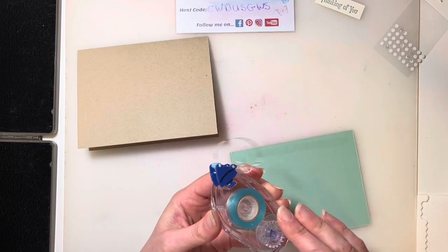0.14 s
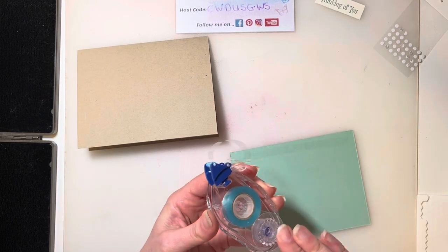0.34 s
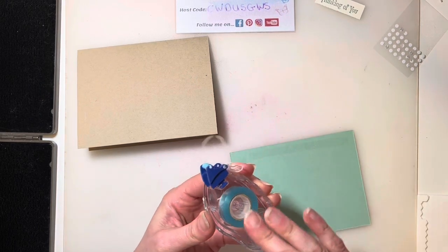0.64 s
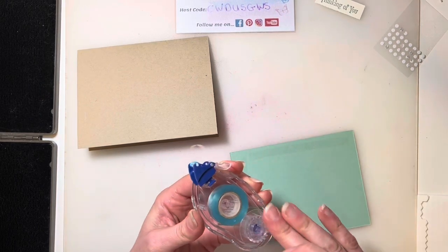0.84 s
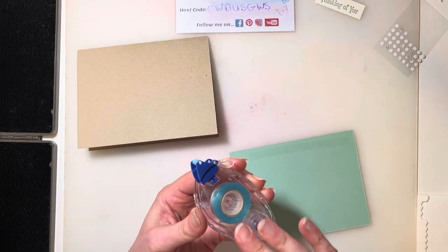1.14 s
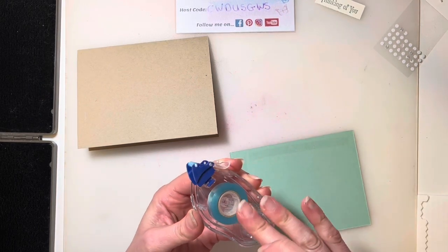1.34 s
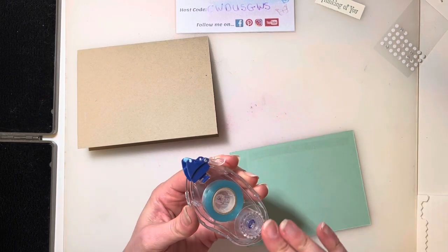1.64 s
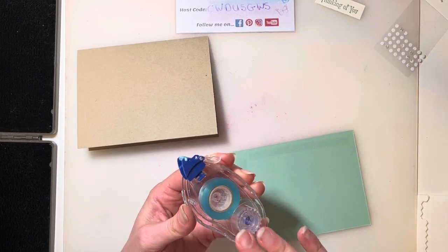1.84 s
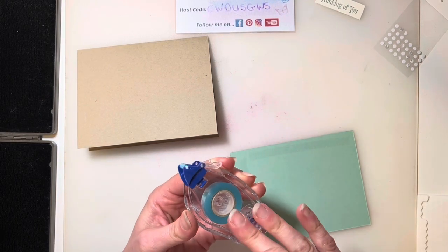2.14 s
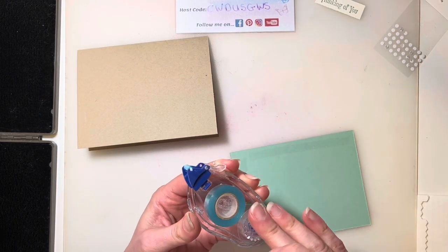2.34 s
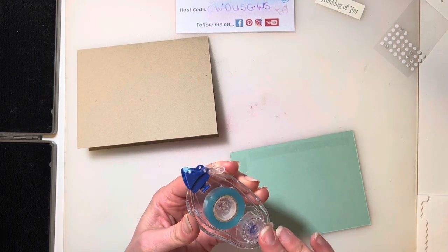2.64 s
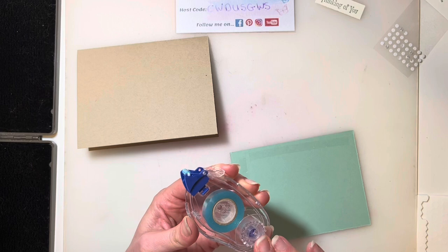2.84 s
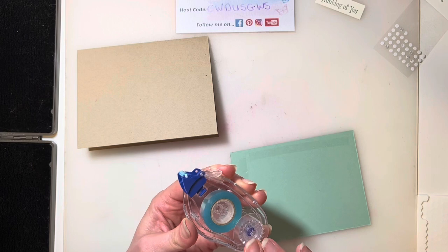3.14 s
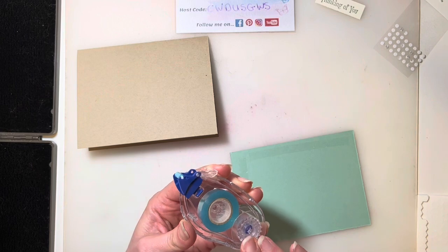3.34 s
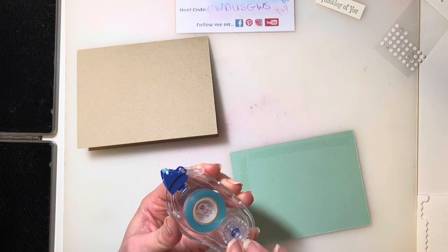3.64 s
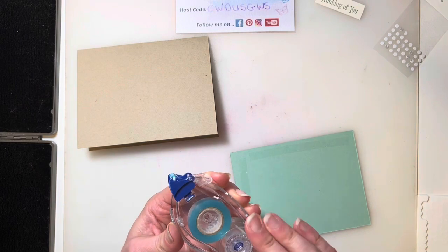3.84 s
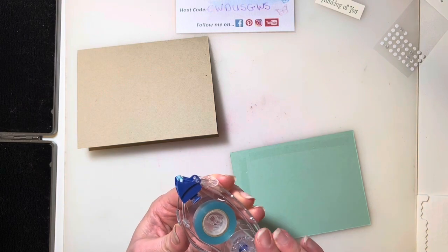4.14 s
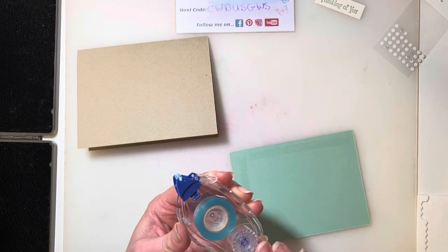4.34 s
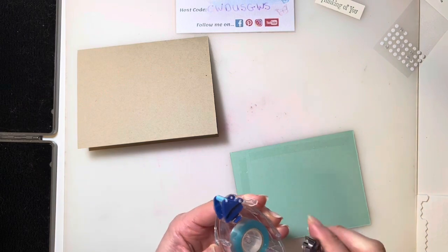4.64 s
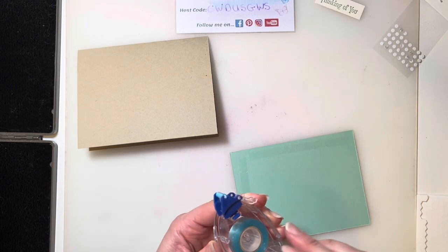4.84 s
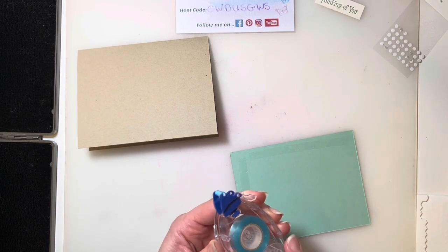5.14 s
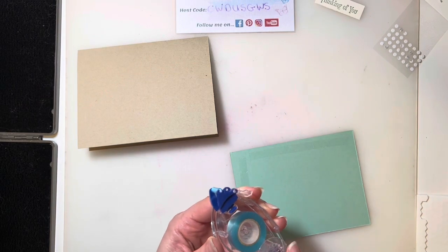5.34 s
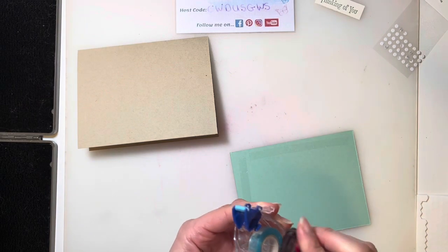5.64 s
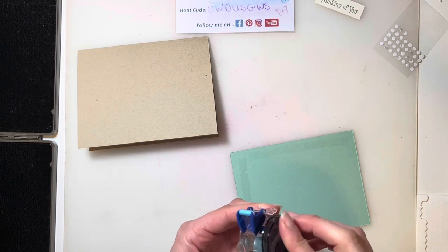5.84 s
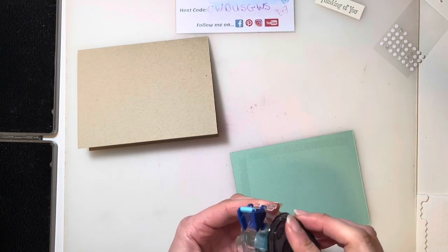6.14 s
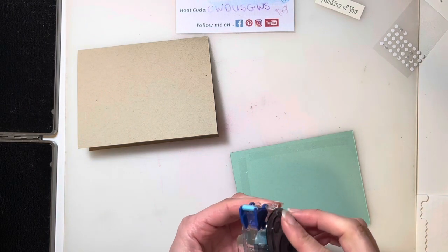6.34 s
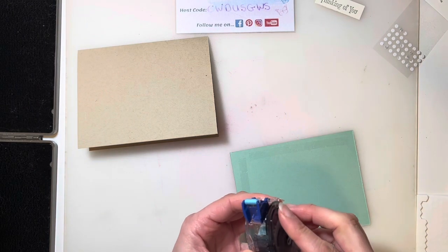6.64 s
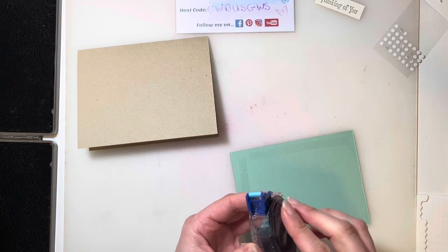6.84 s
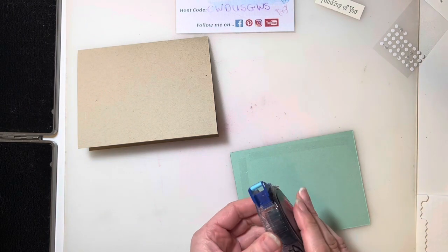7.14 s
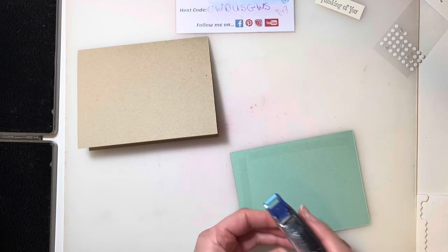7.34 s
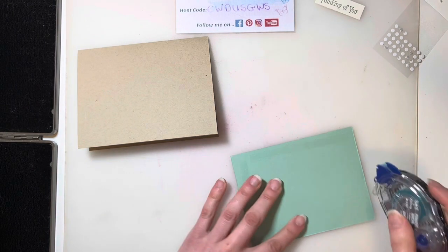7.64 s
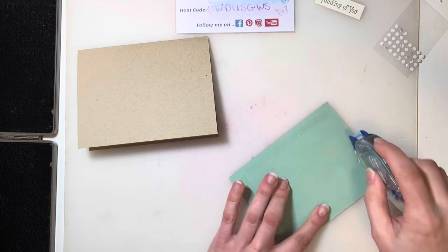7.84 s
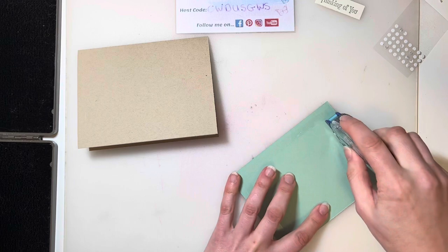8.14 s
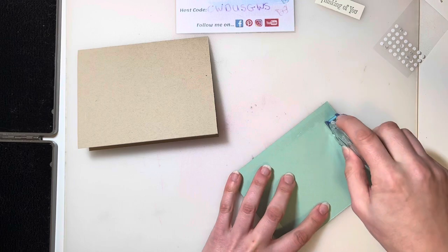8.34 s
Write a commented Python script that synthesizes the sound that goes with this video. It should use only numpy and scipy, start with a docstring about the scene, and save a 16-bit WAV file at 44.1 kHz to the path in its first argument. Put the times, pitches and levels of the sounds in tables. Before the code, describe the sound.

A plastic tape runner's gears ratchet in quick bright clicks, then its cover creaks, snaps shut, and it thuds onto a desk.

```python
"""A plastic tape runner ratchets as a finger turns its gears: the pawl clicks over tooth after tooth,
and each click rings the small parts of the case. The cover creaks in the hands and snaps shut with a
thump, a card hisses round on the desk, and the runner lands on it and rolls with a low rumble.
A quiet room hums behind it all."""
import sys
import numpy as np
from scipy import signal
from scipy.fft import rfft, irfft
from scipy.io import wavfile
from scipy.ndimage import uniform_filter1d

SR = 44100
rng = np.random.default_rng(int(sys.argv[2]) if len(sys.argv) > 2 else 0)


def wav_out(sig):
    """Save sig, one row per channel (or a flat mono array), as 16-bit PCM at SR to the path in sys.argv[1]."""
    wavfile.write(sys.argv[1], SR, np.round(np.clip(np.atleast_2d(sig).T, -1, 1) * 32767).astype(np.int16))


N = 374850


def amp(db):
    """Decibels to gain."""
    return 10 ** (np.asarray(db) / 20)


def unit(x):
    """Scales to energy 1."""
    return x / np.sqrt(np.sum(x ** 2) + 1e-20)


def curve(points, hz):
    """Reads a table on a log-frequency axis."""
    f, value = np.transpose(points)
    return np.interp(np.log(hz + 1), np.log(f + 1), value)


def add(mix, s, sound):
    """Mixes a sound in at second s."""
    part = mix[round(s * SR):][:len(sound)]
    part += sound[:len(part)]


# Stereo image of diffuse sound: (frequency [Hz], left-right correlation [0..1])
CORRELATION = [(60, 0.94), (300, 0.65), (1400, 0.2), (5000, 0.55), (8000, 1)]
def diffuse_noise(spectrum):
    """Two partly alike channels of noise with the given power per Hz."""
    hz = np.fft.rfftfreq(N, 1 / SR)
    left, other = rfft(rng.standard_normal((2, N))) * np.sqrt(SR / 2)
    alike = np.clip(curve(CORRELATION, hz), 0, 1)
    right = alike * left + np.sqrt(1 - alike ** 2) * other
    return irfft(amp(curve(spectrum, hz)) * np.array([left, right]), N)


# Dark bed of room air: (frequency [Hz], density [dB per Hz])
AIR_BED = [(25, -96), (50, -77.5), (165, -85), (314, -89.5), (500, -92), (800, -102), (2120, -107),
           (4660, -114), (6000, -124), (16000, -134)]
# Machine drones: (pitch [Hz], width [Hz], level [dB])
DRONES = [(36, 4, -57.5), (61.5, 2, -53), (121, 8, -67), (233, 10, -69)]
def room_tone():
    """Room air and low machine drones; a narrow band of noise makes each drone waver."""
    hz = np.fft.rfftfreq(N, 1 / SR)
    hum = 0
    for pitch_hz, width_hz, db in DRONES:
        band = np.exp(-((hz - pitch_hz) / width_hz) ** 2)
        waver = unit(irfft(rfft(rng.standard_normal(N)) * band, N))
        steady = unit(np.sin(2 * np.pi * pitch_hz * np.arange(N) / SR))
        hum = hum + amp(db) * np.sqrt(N) * unit(waver + 10 * steady)
    return diffuse_noise(AIR_BED) + hum


def contact(rise_s, fall_s, rattle_s, rattle_db):
    """Envelope of a contact: a quick blow and a weaker rattle after it."""
    t = np.arange(SR // 20) / SR
    return (1 - np.exp(-t / rise_s)) * (np.exp(-t / fall_s) + amp(rattle_db) * np.exp(-t / rattle_s))


SPREAD_DB, DETUNE = 2, .12  # scatter from hit to hit: mode level, pitch as a share of the width
BLUR = 1.5  # widening of the modes when all directions are averaged
def strike(modes, envelope, tap, tilt_db, blur):
    """A clean tap plus a rough scrape rings one part. Columns: direct sound, all-round sound."""
    t = np.arange(SR // 20)[:, None] / SR
    hz, width_hz, db = np.transpose(modes)
    detune, lift, phase = rng.standard_normal((3, len(modes)))
    level = amp(db + tilt_db * np.log2(hz))
    swell = width_hz ** 2 * t * np.exp(-np.pi * width_hz * t)  # a soft start keeps the skirts steep
    pitch_hz = hz + DETUNE * width_hz * detune
    rings = level * amp(SPREAD_DB * lift) * swell * np.sin(2 * np.pi * pitch_hz * t + 1.55 * phase)
    drive = unit(envelope * rng.standard_normal(len(envelope)))
    drive[np.argmax(envelope)] += tap
    direct = signal.fftconvolve(rings.sum(1), drive)[:len(t)]
    wide_hz = blur * width_hz
    wide_swell = wide_hz ** 2.6 * np.sqrt(width_hz) * t * np.exp(-np.pi * wide_hz * t)
    around = level * wide_swell * np.sin(2 * np.pi * hz * t + np.pi / 2 * np.arange(len(hz)))
    low_cut = signal.butter(2, .75 * hz.min(), "highpass", fs=SR)  # small parts radiate little bass
    return np.transpose([unit(signal.lfilter(*low_cut, x)) for x in (direct, around.sum(1))])


# Modes of the plastic parts: (pitch [Hz], width [Hz], relative level [dB])
OPEN_CASE = [(705, 810, 1), (1080, 220, -2), (1590, 480, 5)]  # dull knock
SHUT_CASE = [(880, 59, -8), (1230, 500, -14), (1442, 55, 3), (1780, 140, -10)]  # hollow ring
COVER_MODES = [(1775, 130, -17), (2210, 505, -3), (2440, 300, -7.5), (2984, 400, -4.5), (3700, 460, -2.5),
               (3860, 320, -0.5), (4206, 160, -1), (4720, 470, -2.5), (5800, 500, -7.5)]  # midrange clack
PAWL_MODES = [(6326, 220, -5.5), (6810, 440, -4.5), (7340, 1500, -1)]  # bright tick
RATTLE_MODES = [(9200, 1600, 6), (10900, 3800, -5.5), (13160, 2900, 3.5), (14300, 700, -12)]  # fine top-end sizzle
# Creaks, knocks and snaps: (time [s], cover level [dB], treble offset [dB], case offset [dB])
COVER_HITS = [(.116, -26.5, -7.5, -28), (.173, -27, -7, -29), (3.645, -28, -17.5, -28),
              (3.844, -30, -7, -29.5), (4.564, -27, -16, -23), (4.576, -18, -19, -28),
              (5.601, -27.5, -17, -26.5), (5.613, -32, -19, -30), (5.693, -19, -13, -21),
              (5.714, -17, -23, -30), (5.754, -12.5, -20, -17), (5.768, -13.5, -12.5, -14),
              (5.779, -16, -16, -19), (5.794, -20, -20, -27), (5.805, -22, -28, -23),
              (5.915, -29, -22, -28), (6.038, -34.5, -10.5, -30), (6.074, -21.5, -22, -13),
              (6.126, -20, -18, -18.5), (6.208, -20, -6.5, -16), (6.327, -17.5, -24, -11),
              (6.3405, -17.5, -23, -16), (6.349, -15.5, -17.5, -27), (6.401, -18, -16, -14),
              (6.415, -8, -2, -14.5), (6.427, -26, -10, -19), (6.504, -19.5, -22, -20),
              (6.543, -22, -15, -20), (6.572, -15.5, -17, -11), (6.605, -25.5, -23, -30.5),
              (6.721, -35, -33, -25), (6.9685, -6, -14.5, -16), (6.9705, -7.5, -21, -23),
              (6.9727, -10.5, -6.5, -28), (6.9778, -19.5, -10, -0.5), (7.1615, 0, -7, 7.5),
              (7.1675, 8, -14.5, -10.5), (7.1707, 1, -6.5, -8), (7.381, -29, -13.5, 3),
              (7.887, -39, -6, -2.5), (8.205, -20, -12.5, 1)]
HARD_DB, BRIGHTEN = 1.5, .87  # level of a hard hit; cover tilt in dB per octave for each dB beyond it
SHUT_S = 7.1  # later hits ring the shut case
def cover_handling():
    """Fingers flex the cover and snap it shut; harder hits ring its higher modes."""
    out = np.zeros((3, N, 2))  # three nearby spots in turn
    creak = contact(rise_s=.0026, fall_s=.0009, rattle_s=.0032, rattle_db=-7)
    for k, (s, db, treble_db, case_db) in enumerate(COVER_HITS):
        case = OPEN_CASE if s < SHUT_S else SHUT_CASE
        tap = .6 if db < HARD_DB else 3
        cover_tilt = BRIGHTEN * max(db - HARD_DB, -14)
        for part, part_db, tilt_db in ((case, case_db, 0), (COVER_MODES, 0, cover_tilt),
                                       (PAWL_MODES, treble_db, 0), (RATTLE_MODES, treble_db + 1.8, 0)):
            ring = strike(part, creak, tap, tilt_db, blur=1.05 if part is SHUT_CASE else BLUR)
            add(out[k % 3], s, amp(db + part_db) * ring)
    return out


# Colour of the friction hiss: (frequency [Hz], relative density [dB])
HISS_COLOUR = [(500, 5), (3500, 7), (5500, 1), (11000, -3), (16000, -3)]
# Skin and card slides: (hold start [s], hold length [s], level [dB], fade-in [dB/s])
SLIDE_CUES = [(0.175, 0.029, -59.5, 320), (4.006, 0.63, -74, 57), (5.75, 0.021, -56, 191),
              (6.935, 0.021, -58.5, 100), (7.03, 0.47, -66, 302), (7.626, 0.18, -61, 705.5),
              (7.89, 0.094, -63.5, 401.5), (8.33, .2, -48.5, 590.5)]
FADE_DB_PER_S, RUSTLE_DB, GRAIN_DB = 237, -84.5, 2.2  # fade-out, floor between slides, roughness
CARD_S, CARD_LIFT_DB = 7.6, 9.5  # the turning card hisses brighter
def slides():
    """Grainy hiss of skin on plastic and card on the desk; each slide swells, holds and fades."""
    t, level_db = np.arange(N) / SR, RUSTLE_DB
    for start, length, db, rise in SLIDE_CUES:
        fade_db = np.minimum(rise * (t - start), FADE_DB_PER_S * (start + length - t))
        level_db = np.maximum(level_db, db + np.minimum(fade_db, 0))
    grain = unit(uniform_filter1d(rng.standard_normal(N), size=150)) * np.sqrt(N)
    hiss = np.sqrt(2 * N) * unit(diffuse_noise(HISS_COLOUR))
    treble = signal.lfilter(*signal.butter(2, 8000, "highpass", fs=SR), hiss)
    card_turning = (t > CARD_S) & (t < CARD_S + .27)
    hiss += (amp(CARD_LIFT_DB) - 1) * treble * card_turning
    return amp(level_db + GRAIN_DB * grain) * hiss


# The holding hand frees or damps parts of the case:
# (time [s], shell offset while winding [dB], flank over shell [dB], ribs over shell [dB])
HAND_GRIP = [(.347, 2, -7, -6.5), (.4, -16.5, -22, 1.5), (.447, 3.5, -4, -7), (.5, -9, -11, -6),
             (.6, -12, -7.5, 0), (.68, -6, -7, -2.5), (.77, -4.5, -10.5, 0.5), (.81, 0, -5, -9),
             (.95, -10, -1.5, -5), (1.0, 3.5, -8, -3.5), (1.08, -13.5, -6, 1.5), (1.16, -9, -10.5, -0.5),
             (1.345, -6.5, -16, -4), (1.42, -8.5, -6, 6.5), (1.53, -1.5, -7, -6), (1.6, -14, -4.5, -6),
             (1.7, -1.5, 3, -3.5), (1.83, -10, -5, -7.5), (1.95, -7.5, -12, 1.5), (2.27, -4, -13.5, -1.5),
             (2.38, -1, -2.5, 1.5), (2.55, -9, 0.5, -8), (2.8, -23, 6, -2.5), (2.95, -9, -8.5, 1),
             (4.2, -9, -2.5, 0), (5.2, -9, -0.5, -3.5), (8.4, -9, -4.5, -5)]
# The finger pushes and eases, one list per unbroken wind: (time [s], speed [teeth/s])
GEAR_WINDS = [
    [(.3463, 31.6), (.403, 32.8), (.451, 79.8), (.478, 51.0), (.538, 40.3), (.631, 77.5), (.658, 58.5),
     (.76, 32.1), (.817, 68.5), (.847, 77.8), (.913, 40.5), (.949, 42.8), (1.009, 88.0), (1.09, 45.5),
     (1.147, 87.4), (1.18, 73.8)],
    [(1.3435, 41.7), (1.368, 50.1), (1.464, 33.4), (1.542, 71.9), (1.614, 30.4), (1.698, 51.9),
     (1.722, 59.5), (1.8, 18.8), (1.857, 56.7), (1.881, 65.4), (1.961, 54.1)],
    [(2.2592, 30.6), (2.349, 32.7), (2.436, 28.2), (2.466, 24.0), (2.611, 14.1)],
]
TOOTH_DB, UNEVEN_DB = -5, 1.5  # click level and its scatter
def wound_teeth():
    """One pawl drop for each whole tooth the gear turns: (time [s], level [dB], shell offset [dB])."""
    grip_s, shell_db, _, _ = np.transpose(HAND_GRIP)
    clicks = []
    for wind in GEAR_WINDS:
        s, speed = np.transpose(wind)
        t = np.arange(s[0], s[-1], 1 / SR)
        teeth = np.cumsum(np.interp(t, s, speed)) / SR
        drop_s = t[np.searchsorted(teeth, np.arange(np.ceil(teeth[-1])))]
        db = TOOTH_DB + UNEVEN_DB * rng.standard_normal(len(drop_s))
        clicks += zip(drop_s, db, np.interp(drop_s, grip_s, shell_db))
    return clicks


# Case modes that colour each click: (pitch [Hz], width [Hz], relative level [dB])
FLANK_MODES = [(2378, 390, 2.5), (2160, 360, -15.5)]
SHELL_MODES = [(3005, 440, 6), (3475, 550, -1)]
RIB_MODES = [(4350, 790, 0.012), (5120, 540, 0)]
# Teeth nudged over one at a time: (time [s], level [dB], shell offset [dB])
SINGLE_TEETH = [(0.1992, -3.5, 0), (0.221, -5.5, -3), (0.2472, -4.5, -1), (0.2845, -5, -3),
                (0.8285, -10.5, 5.5), (1.2403, -1.5, -7), (1.3062, -2.5, -16), (2.1784, -5, 1),
                (2.77, -6.5, -13.5), (2.8579, -5.5, -11), (2.927, -4, -5), (2.986, -2, -6),
                (3.325, -6, -10), (3.9327, -4, -13.5), (4.1202, -3.5, -15.5), (4.1963, -4.5, -15),
                (4.219, -2.5, -10.5), (4.244, -1, -11.5), (4.27, -3, -9), (4.325, -2.5, -14),
                (5.0792, -11, 4.5), (5.114, -10, 4.5), (5.1499, -8.5, 6), (5.2434, -8, 3),
                (5.3073, -7.5, 1.5), (5.3464, -6.5, 1), (5.465, -30.5, 10.5), (8.3266, -8, -7.5),
                (8.3578, -11, -1.5), (8.3823, -11, 0.5), (8.4152, -14, 4), (8.44, -16.5, 7)]
# Slowly changing level of the fine rattle in the clicks: (time [s], offset [dB])
RATTLE_LEVEL = [(.25, 1), (.45, 0), (3.3, 1.5), (3.95, 1), (4.23, -1.5), (5.1, 12.5), (5.35, 8.5),
                (5.47, -1), (8.32, -2.5), (8.44, 9)]
TOUCHDOWN_S = 8.204  # the roller meets the card
def ratchet():
    """The pawl snaps off each gear tooth and shakes the case; on the card it drags and booms more."""
    out = np.zeros((3, N, 2))  # three nearby spots in turn
    snap = contact(rise_s=.0001, fall_s=.0007, rattle_s=.0032, rattle_db=-9)
    drag = contact(rise_s=.000374, fall_s=.00099, rattle_s=.0075, rattle_db=-13.5)
    grip_s, _, flank_ride, rib_ride = np.transpose(HAND_GRIP)
    for k, (s, db, shell_db) in enumerate(SINGLE_TEETH + wound_teeth()):
        rattle_db = np.interp(s, *np.transpose(RATTLE_LEVEL))
        flank_db = shell_db + np.interp(s, grip_s, flank_ride) - 4.34
        rib_db = shell_db + np.interp(s, grip_s, rib_ride) - 2.46
        knock_db = shell_db / 2 - 24 + 4 * rng.standard_normal()
        if s < TOUCHDOWN_S:
            envelope, tap, case = snap, 2.2, (OPEN_CASE, knock_db, 0)
        else:
            envelope, tap, case = drag, .6, (SHUT_CASE, shell_db - 3.5, 7)
        layers = (case, (FLANK_MODES, flank_db, 0), (SHELL_MODES, shell_db + .07, 0),
                  (RIB_MODES, rib_db, 0), (PAWL_MODES, .3, 0), (RATTLE_MODES, rattle_db, 0))
        for part, part_db, tilt_db in layers:
            part_tap = .3 * tap if part is RATTLE_MODES else tap
            ring = strike(part, envelope, part_tap, tilt_db, blur=3.2 if part is SHELL_MODES else BLUR)
            add(out[k % 3], s, amp(db + part_db) * ring)
    return out


def lid_thump(snap_s=7.168, pitch_hz=185, t60_s=.4):
    """The lid snaps home and thumps low through the hands."""
    out, t = np.zeros(N), np.arange(SR // 4) / SR
    envelope = amp(-43 - 60 * t / t60_s) * np.minimum(t / .038, 1)
    add(out, snap_s, envelope * np.sin(2 * np.pi * pitch_hz * t))
    return out


def landing(roll_s=8.32):
    """The runner is pressed on the card: the desk top thuds, then rumbles under the roller."""
    out, t = np.zeros(N), np.arange(SR // 2) / SR
    knock = amp(-29 - 60 * t / .016) * np.sin(2 * np.pi * 260 * t)
    thud = amp(-28 - 60 * t / .061) * np.sin(-2 * np.pi * 85 * t)
    desk_band = signal.butter(2, [95, 300], "bandpass", fs=SR, output="sos")
    rumble = signal.sosfilt(desk_band, rng.standard_normal(len(t)))
    add(out, TOUCHDOWN_S, knock)
    add(out, TOUCHDOWN_S + .0097, thud)
    add(out, roll_s, amp(-30) * rumble * np.clip(t / .012, 0, 1))
    return out


# Reflections off the desk and nearby things: (delay [s], level [dB])
EARLY_ECHOES = [(.0026, -13), (.0092, -20)]
# Short room tail: (frequency [Hz], time to fall 60 dB [s])
TAIL_DECAY = [(500, 0.14), (1500, 0.2), (4000, 0.22), (12000, 0.16)]
def room(hits, tail_db):
    """The direct sound gets early echoes; the all-round sound feeds a short diffuse tail."""
    direct, around = hits.T
    early = np.zeros((2, SR // 20))
    early[:, 0] = 1
    for s, db in EARLY_ECHOES:
        for channel in early:
            add(channel, s, unit(rng.standard_normal(size=40)) * amp(db))
    white = diffuse_noise([(1, 0)])[:, :SR // 2]
    hz, t, bands = signal.stft(white, SR, nperseg=128)
    onset = np.clip(t / .0024, 0, 1)
    decay = amp(-60 * t / curve(TAIL_DECAY, hz)[:, None])
    tail = signal.istft(bands * onset * decay, SR, nperseg=128)[1]
    wet = signal.fftconvolve(around[None], unit(tail) * np.sqrt(2), axes=1)[:, :N]
    return signal.fftconvolve(direct[None], early, axes=1)[:, :N] + amp(tail_db) * wet


def scene():
    """The full mix; each spot that clicks or creaks has its own echoes."""
    gears = sum(room(spot, tail_db=-10.5) for spot in ratchet())
    cover = sum(room(spot, tail_db=-6) for spot in cover_handling())
    return gears + cover + lid_thump() + landing() + slides() + room_tone()


# Left-right phase, held near antiphase around 8-9.4 kHz: (frequency [Hz], left lead [rad])
STEREO_PHASE = [(0, 0), (300, .1), (3200, 1.1), (5200, .2), (7900, -3.0), (9400, -3.4), (10900, -5.9),
                (12500, -6.5), (15100, -9.4)]
# Left-right level, centred above 8.2 kHz: (frequency [Hz], left over right [dB])
STEREO_BALANCE = [(400, -.5), (700, 2.5), (1300, -1.5), (3000, 1.8), (7000, 1.8), (8200, 0)]
HIGH_CUT_HZ = 16800
def record(dry):
    """Left and right differ in phase and level by frequency; a steep high cut trims the top."""
    hz = np.fft.rfftfreq(N, 1 / SR)
    lead = np.interp(hz, *np.transpose(STEREO_PHASE))
    left = np.exp(.5j * lead) * amp(curve(STEREO_BALANCE, hz) / 2)
    stereo = irfft(rfft(dry) * np.array([left, 1 / left]), N)
    high_cut = signal.firwin(255, HIGH_CUT_HZ, window=("kaiser", 9), fs=SR)
    return signal.oaconvolve(stereo, high_cut[None], "same")


dry = scene()
out = record(dry)
wav_out(out)
```